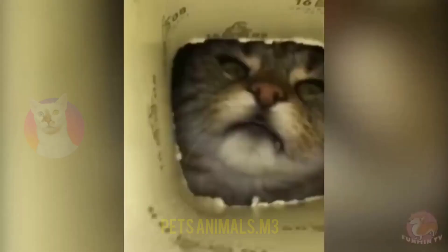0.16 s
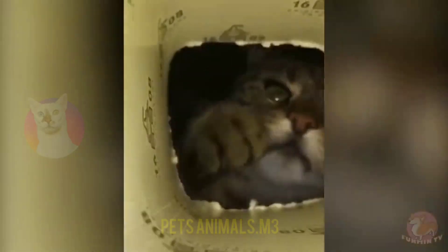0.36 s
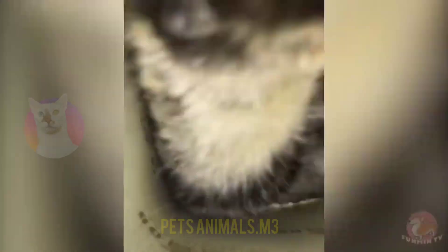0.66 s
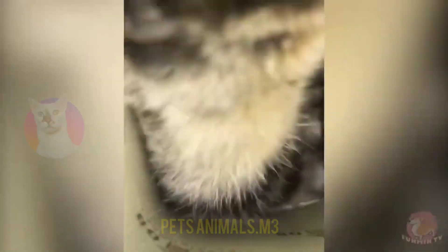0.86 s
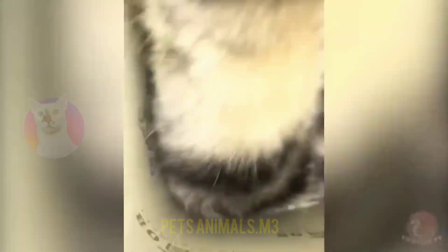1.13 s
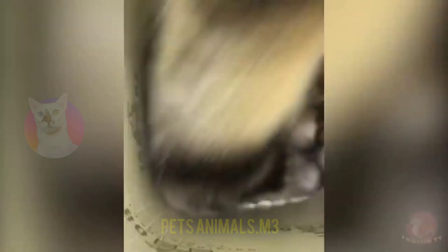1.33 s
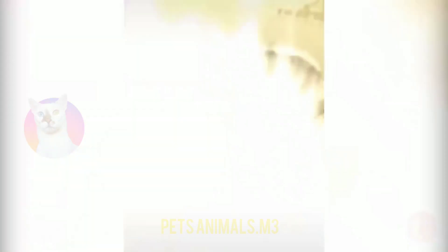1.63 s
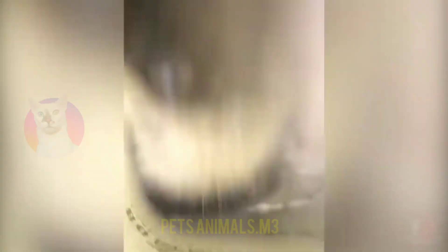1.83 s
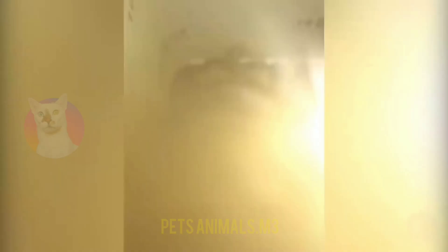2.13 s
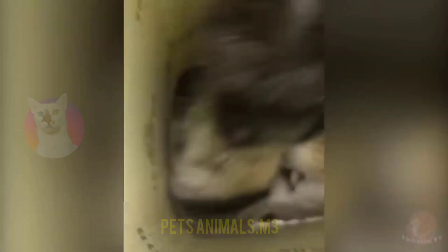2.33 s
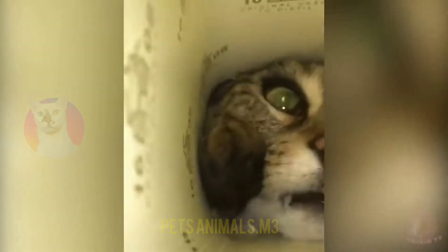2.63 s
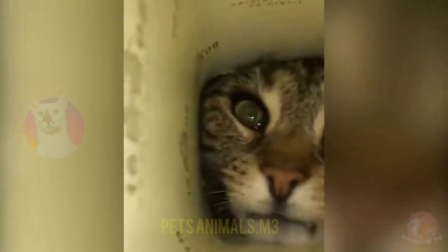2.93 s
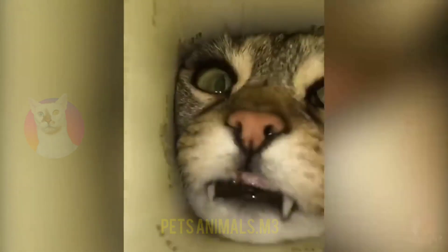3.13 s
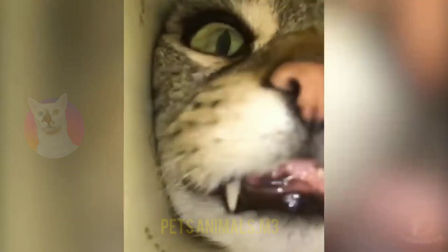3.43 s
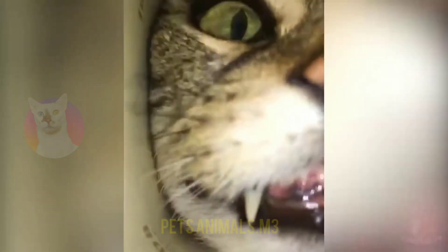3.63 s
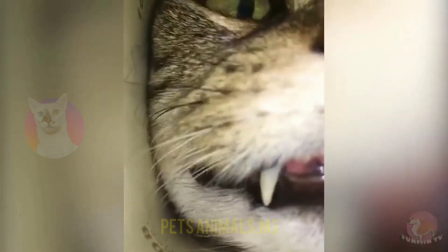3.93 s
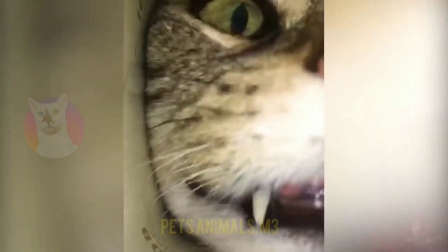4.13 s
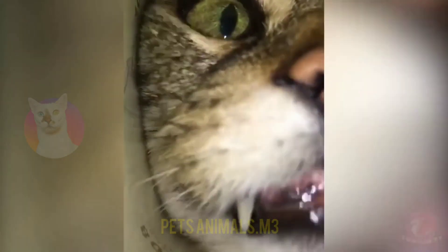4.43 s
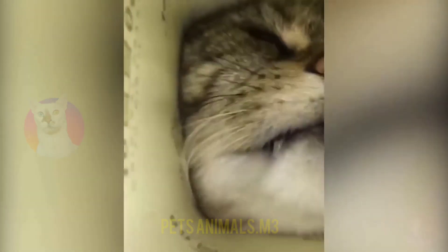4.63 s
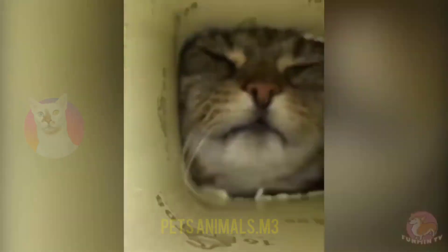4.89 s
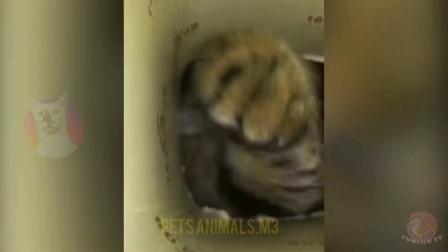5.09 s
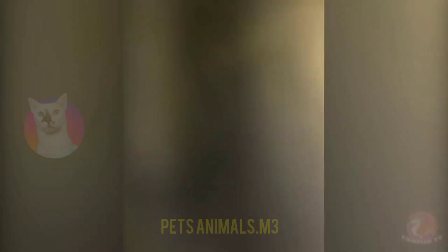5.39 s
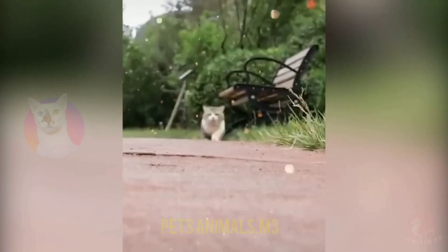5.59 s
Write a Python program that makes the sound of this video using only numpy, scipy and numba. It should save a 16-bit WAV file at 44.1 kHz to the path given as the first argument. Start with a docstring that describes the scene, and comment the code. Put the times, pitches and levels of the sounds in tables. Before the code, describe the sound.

A close, dry, almost mono phone perspective inside a cardboard box as a cat pushes through a torn hole. A faint rubbing grumble opens, with a raspy swipe and low thump near 0.2 s. Hard hollow knocks with claw ticks strike around 0.55, 0.65 and 0.9 s, mixed with brief bright scrapes of fur over the ragged edge. More clusters come at 1.2, 1.45 and 1.6 s; the heaviest, slightly squashed by the microphone, lands about 1.95 s with a deep box thump, and another around 2.2 s. From 2.4 to 3.2 s, soft dull pats patter over airy fur hiss and wall grumble, with a tiny faint squeak at 2.6 s. Then it is sparser: a knock at 3.7 s, near quiet around 4.1, a sharp tight knock cluster at 4.6, gentle rubbing, small ticks around 5.1 to 5.35, and a last dull knock at 5.5 before stopping abruptly.

```python
"""A cat reaches through a hole in a cardboard box towards a phone lying inside.
Rubbed walls grumble from the start: coloured stick-slip clicks. Paw and claws soon knock the walls:
short decaying modes, with low thumps as the box is shoved. Swipes drag fur over the torn edge: hair
hisses, the edge rasps in drifting bands. A faint squeak comes midway; the sound stops short at the end.
The phone rounds off the loudest knocks."""
import sys
import numpy as np
from scipy import signal
from scipy.fft import rfft, irfft
from scipy.io import wavfile
from scipy.ndimage import uniform_filter1d
from numba import njit

SR = 44100
rng = np.random.default_rng(int(sys.argv[2]) if len(sys.argv) > 2 else 0)


def dump(signal):
    """Clip the signal to [-1, 1] and save it as 16-bit WAV at the path in sys.argv[1]."""
    limited = np.clip(np.atleast_2d(signal).T, -1, 1)
    pcm = np.round(limited * 32767).astype(np.int16)
    wavfile.write(sys.argv[1], SR, pcm)


def volts_from_db(level):
    """Convert decibel levels to linear amplitude ratios."""
    exponent = np.asarray(level, float) / 20
    return 10 ** exponent


N = 253575
END_S = 5.538

# face and shoulder leaning on the card: start_s, hiss_db, grumble_db (interpolated)
LEAN_CURVE = [(0.0, -97, -63), (0.3, -89, -59), (0.42, -74, -63.5), (0.46, -91, -64.5), (0.75, -72, -45),
              (1.8, -63.5, -48), (2.09, -94.5, -50.5), (2.36, -65, -50.5), (2.46, -52.5, -33.5),
              (2.822, -45, -38.5), (2.911, -58, -44), (3.11, -46.5, -37), (3.62, -55.5, -38),
              (3.73, -62, -39), (3.91, -80, -47.5), (4.08, -84.5, -54.5), (4.27, -61.5, -42.5),
              (4.39, -64.5, -43.5), (4.448, -73, -49), (4.59, -55.5, -41.5), (4.82, -44.5, -36),
              (4.876, -53.5, -42.5), (4.99, -45, -36), (5.061, -52, -41), (5.14, -69.5, -55.5),
              (5.25, -51.5, -35), (5.32, -59, -49.5), (5.54, -66.5, -33)]
# furry leg over the torn edge: start_s (rise complete), length_s, hiss_db, rasp_over_hiss_db,
# rasp_centre_hz (at full level), grumble_db
SWIPES = [(0.184, 0.097, -43.5, 2.5, 2440, -31.5), (0.506, 0.041, -60.5, 8, 1500, -63.5),
          (0.548, 0.046, -39, 7, 2885, -29), (0.603, 0.1, -50, 10, 1600, -33.5),
          (0.779, 0.062, -51, 5.5, 2000, -61), (0.881, 0.03, -52, 5, 2200, -46.5),
          (0.946, .02, -55.5, 14, 2900, -47), (0.975, 0.09, -39, 8, 4000, -38),
          (1.05, 0.039, -52.5, 7.5, 2860, -39), (1.3, 0.036, -46.5, 10, 4110, -40.5),
          (1.356, 0.0058, -56, 12.5, 1315, -32.5), (1.454, 0.08, -54, 12, 2600, -32.5),
          (1.624, 0.035, -39, 2.5, 1598, -30), (1.698, 0.051, -50.5, 9, 2210, -44.5),
          (1.863, 0.052, -54, 10, 2840, -44), (1.95, 0.0074, -32.5, 3.5, 1300, -27),
          (1.98, 0.052, -51, 11, 2100, -34), (2.144, .035, -63.5, 13, 2500, -43),
          (2.195, 0.028, -46, 9.5, 1800, -26.5), (2.24, 0.053, -53, 13.5, 1750, -29.5),
          (2.594, 0.047, -43.5, 7.5, 2250, -31.5), (3.061, 0.0057, -38, 7, 3220, -29.5),
          (3.772, 0.075, -59, 12.5, 2000, -39), (3.965, 0.044, -66, 11, 900, -51),
          (5.036, 0.0071, -46, 7, 4210, -54), (5.133, 0.0042, -56.5, 6.5, 4000, -49),
          (5.392, 0.064, -51, -6.5, 2300, -69)]
# colours of hair, torn edge, rubbed wall and rocking box: frequency_hz, relative_density_db
HAIR_COLOUR = [(2760, -31.5), (4500, -4.5), (5000, 2.5), (5700, 6), (9280, 6.5), (12600, 4), (13500, -7.5)]
EDGE_COLOUR = [(600, -21), (850, -5.5), (1200, 0), (1700, -2.5), (2250, -2.5), (2600, -6.5), (3100, -8),
               (4750, -10.5), (5200, -19), (6500, -34.5)]
GRUMBLE_COLOUR = [(25, -25.5), (55, -12.5), (130, -6), (244, -4), (355, -2.5), (465, -12.5), (628, -8.5),
                  (786, -20), (900, -24), (1170, -18.5), (1500, -49.5), (1980, -120)]
ROCK_COLOUR = [(25, -20), (55, -5), (100, -8.5), (160, -28)]
# mean pitches of stiff fibres of the tear: pitch_hz
FIBRES_HZ = (2876, 3350., 3910, 4650)
# blows on the card: start_s (before the onset lag), wall_peak_db, wall_tone_hz,
# claw_db (relative to the wall)
KNOCKS = [(0.077, -33, 245, -81), (0.171, -33, 240, -30), (0.229, -14, 276, -35), (0.533, -1.5, 312, -19),
          (0.545, -14, 286, -27.5), (0.651, -3, 387, -8), (0.662, -11.5, 325, -34), (0.857, -26, 248, -19),
          (0.873, -23, 320, -25), (0.908, -9, 340, -11), (0.978, -22.5, 562, -65), (1.2, -15.5, 400, -9.5),
          (1.21, -7, 424, -12), (1.219, -11.5, 332, -27), (1.225, -13.5, 355, -34), (1.289, -27, 290, -8),
          (1.326, -20.5, 412, -13), (1.417, -44, 320, -27), (1.445, -4, 395, -5.5), (1.454, -27, 330, 5),
          (1.612, -11.5, 400, -2), (1.634, -4.5, 263, -5.5), (1.644, -6.5, 233.5, -17),
          (1.897, -26, 588, -1), (1.945, -21, 355, -2.5), (1.96, -0.5, 345, -6), (1.973, -3.5, 280, -16),
          (2.052, -25, 270, -61), (2.143, -17.5, 319, -54), (2.187, -31, 575, 3), (2.202, -9.5, 193, 0.5),
          (2.211, -4.5, 296, -9), (2.264, -14, 312, -56), (2.286, -23, 291, -51), (2.395, -32.5, 277, -27),
          (2.474, -20.5, 187, -45), (2.492, -17, 231, -61), (2.512, -18, 184, -38),
          (2.534, -22.5, 199, -52), (2.553, -23.5, 228, -49), (2.6, -17, 276, -34), (2.618, -19, 266, -26),
          (2.666, -19.5, 264, -65), (2.86, -16, 231, -58), (2.888, -22, 210, -42), (2.941, -21.5, 568, -61),
          (3.072, -17.5, 215, -49), (3.2, -22.5, 279, -14), (3.6832, -9.5, 301, -17.5),
          (3.915, -28, 161, -31), (4.534, -31, 302, -30), (4.579, -5, 338, -12.5), (4.588, -6, 265.4, -17),
          (4.6, -9, 243, -26), (4.797, -27, 253, -27), (4.811, -24.5, 298, -25), (4.843, -27, 280, -30),
          (5.089, -31.5, 352, -25), (5.335, -23.5, 595, 1.5), (5.499, -12, 289, -48)]
# wall modes: multiple_of_wall_tone, relative_db, t60_s
WALL_MODES = [(0.661, 7.5, 0.038), (1.01, 10, 0.068), (1.301, -1.5, 0.022), (1.6, 4, 0.015),
              (2.099, -1.5, 0.027)]
# claw modes of the card skin, means before scatter: pitch_hz, relative_db, t60_s
SKIN_MODES = [(691, 3, 0.0055), (1180, 14, 0.0066), (1500, 14, 0.0052), (2144, -6, 0.02),
              (2830, 6.5, 0.0045), (4000, -17.5, 0.007)]
# pushes that move the whole box: start_s, level_db, pitch_hz
SHOVES = [(0.17, -18, 136), (0.224, -7.5, 53), (1.637, -9, 69.4), (1.963, -1.5, 66.6), (2.207, -7, 72),
          (2.49, -24, 112), (3.073, -22.5, 105), (4.582, -17.5, 112)]
# hair or claw sticking on the card: start_s, length_s, mean_pitch_hz, level_db
SQUEAKS = [(2.605, 0.035, 2230, -35)]

# a swipe comes up fast, tires while it lasts, lifts off, and the fur settles softly
RISE_DB_PER_S, SAG_DB_PER_S, FALL_DB_PER_S = 803.5, 44.5, 600
SETTLE_DB, SETTLE_DB_PER_S = -19.5, 159
# a lighter touch loses hiss faster than rasp: rasp over hiss at HISS_REF_DB, growth per dB less
HISS_REF_DB, RASP_OVER_DB, RASP_PER_DB = -50, 5.5, 0.3149
# faster rubbing is louder and its rasp higher
RASP_HZ, RASP_OCT_PER_DB = 2500, 0.07
RASP_SHARP = 1.5  # centre over width, per band-pass stage
ONSET_LAG_S = 0.001465  # constant delay from table time to knock onset
THUMP_RISE_S, THUMP_T60_S = 0.00032, 0.078


def set_rms(x, db):
    """Scale to an rms level."""
    return x * volts_from_db(db) / np.sqrt(np.mean(x ** 2))


def colour(x, shape):
    """Filter by (Hz, dB) points over log frequency, near silent beyond the ends."""
    hz, db = np.transpose(shape)
    f = np.fft.rfftfreq(N, 1 / SR) + 1
    gain_db = np.interp(np.log(f), np.log(hz), db, -120, -120)
    return irfft(rfft(x) * volts_from_db(gain_db), N)


def walk(rate_hz):
    """Random levels, one per 1 / rate, joined by straight slews; spread near 1."""
    hold = int(SR / rate_hz)
    steps = np.repeat(rng.standard_normal(N // hold + 1), hold)
    return uniform_filter1d(steps, hold)[:N] * np.sqrt(3 / 2)


def slips(rate_hz, spread_db):
    """Stick-slip: dense clicks of uneven size."""
    slipping = rng.random(N) < rate_hz / SR
    return slipping * volts_from_db(spread_db * rng.exponential(1, N)) * rng.standard_normal(N)


@njit
def moving_band(x, hz, sharp):
    """State-variable band-pass whose centre moves every sample; sharp is centre over width."""
    y, band, low, damping = np.empty(len(x)), 0., 0., 1 / sharp
    for i in range(len(x)):
        g = np.tan(np.pi * hz[i] / SR)
        v = (band + g * (x[i] - low)) / (1 + g * (g + damping))
        band, low, y[i] = 2 * v - band, low + 2 * g * v, damping * v
    return y


def decay(t, t60_s):
    """Exponential loss of 60 dB in t60."""
    return np.exp(-np.log(1000) * t / t60_s)


def ring(t, hz, t60_s):
    """A decaying mode."""
    return decay(t, t60_s) * np.sin(2 * np.pi * hz * t)


def add(out, start_s, db, sound):
    """Mix one sound in at its start."""
    i = int(start_s * SR)
    out[i:i + len(sound)] += volts_from_db(db) * sound


def swipe(t, length_s):
    """Level in dB around a swipe's start: rise, sagging hold, lift-off, settling fur."""
    after = np.maximum(t - length_s, 0)
    held_db = RISE_DB_PER_S * np.minimum(t, 0) - SAG_DB_PER_S * np.clip(t, 0, length_s)
    return held_db + np.maximum(-FALL_DB_PER_S * after, SETTLE_DB - SETTLE_DB_PER_S * after)


def contact():
    """Hiss, rasp, grumble, rock dB and rasp Hz: powers of lean and swipes add, rasp power weights Hz."""
    t = np.arange(0, N + 64, 64) / SR
    s, lean_hair_db, lean_wall_db = np.transpose(LEAN_CURVE)
    hair_db = np.interp(t, s, lean_hair_db)
    edge_db = hair_db + RASP_OVER_DB + RASP_PER_DB * (HISS_REF_DB - hair_db)
    wall_db = np.interp(t, s, lean_wall_db)
    power = volts_from_db([hair_db, edge_db, wall_db, wall_db - 5]) ** 2
    weighted_hz = power[1] * RASP_HZ * 2 ** (RASP_OCT_PER_DB * (edge_db - HISS_REF_DB))
    for start_s, length_s, hiss_db, over_db, hz, grumble_db in SWIPES:
        shape_db = swipe(t - start_s, length_s)
        # the box rocks mostly by swipes
        full_db = np.array([[hiss_db], [hiss_db + over_db], [grumble_db], [grumble_db - 0.5]])
        more = volts_from_db(shape_db + full_db) ** 2
        power = power + more
        weighted_hz = weighted_hz + more[1] * hz * 2 ** (RASP_OCT_PER_DB * shape_db)
    curves = (*(10 * np.log10(power)), weighted_hz / power[1])
    return [np.interp(np.arange(N) / SR, t, c) for c in curves]


def wall_grumble(wall_db):
    """Walls grumble in coarser jerks; rubbing keeps two wall tones ringing."""
    jerks = set_rms(colour(slips(2000, 0.54), GRUMBLE_COLOUR), 0)
    wall = jerks.copy()
    for hz, db in ((290., 3), (620., 1)):
        wall += volts_from_db(db) * moving_band(jerks, hz * np.exp(0.12 * walk(8)), 8.)
    return set_rms(wall, 0) * volts_from_db(wall_db + 2.2 * walk(21))


def box_rock(rock_db):
    """The box rocks under the rubbing: wavering low noise."""
    return set_rms(colour(rng.standard_normal(N), ROCK_COLOUR), -7.5) * volts_from_db(rock_db + 1.4 * walk(15))


def hair_hiss(hair_db, catch):
    """Hairs slip in dense small clicks; tufts touch in turn, so bands swell and fade on their own."""
    hiss = set_rms(colour(slips(16000, 0.63), HAIR_COLOUR), 0)
    hiss = hiss * volts_from_db(hair_db + 1.0 * catch + 0.28 * walk(22))
    tufts = np.zeros(N)
    for hz in (5600., 8000., 11500.):
        tufts += moving_band(hiss, np.full(N, hz), 1.98) * volts_from_db(3.7 * walk(14) - 8.5)
    return .5 * hiss + tufts


def side_treble(hair_db):
    """Treble noise of opposite sign left and right: the treble differs slightly between channels."""
    return set_rms(colour(rng.standard_normal(N), HAIR_COLOUR), -11.5) * volts_from_db(hair_db + 3 * walk(30))


def edge_rasp(edge_db, edge_hz, catch):
    """Uneven slips over the torn edge drive its flaps, a moving bright band and stiff fibres."""
    # harder strokes favour the bright band
    pressure_db = 0.23 * (edge_db + 36.0)
    broad = set_rms(colour(slips(5000, 1.5), EDGE_COLOUR), -4.5)
    # flaps catch in turn, each in its own drifting band
    flaps = np.zeros(N)
    for hz in (900., 1377.0, 2250., 3060.0, 3950.0):
        flap = moving_band(broad, hz * np.exp(0.1 * walk(9)), 4.48)
        flaps += flap * volts_from_db(5.1 * walk(21) + 0.33 * pressure_db * np.log2(hz / 1600) - 2.0)
    body = 0.44 * broad + flaps
    # the bright band wobbles as the fur shifts over the tear
    band_hz = edge_hz * np.exp(0.05 * walk(20))
    band = colour(slips(6000, .7), EDGE_COLOUR)
    for _ in range(2):
        band = moving_band(band, band_hz, RASP_SHARP)
    band = set_rms(band, 0)
    # single stiff fibres sing in narrow, wavering lines
    fibres = np.zeros(N)
    for hz in FIBRES_HZ:
        line = moving_band(band / band.std(), hz * np.exp(0.042 * walk(15)), 22.)
        fibres += line * volts_from_db(2.5 + 2.3 * walk(25))
    bright = set_rms(band + fibres, -4.5)
    # the higher the bright band, the more it takes over from the broad rasp
    focus_db = 2.38 * np.log2(edge_hz / RASP_HZ)
    bright = bright * volts_from_db(pressure_db + focus_db + 0.76 * walk(40))
    return (body * volts_from_db(-focus_db) + bright) * volts_from_db(edge_db + 1.36 * catch)


def rubbing():
    """One contact drives grumble, rocking, hiss and rasp; hiss and rasp share its catches."""
    hair_db, edge_db, wall_db, rock_db, edge_hz = contact()
    catch = walk(35)
    mid = wall_grumble(wall_db) + box_rock(rock_db)
    mid = mid + hair_hiss(hair_db, catch) + edge_rasp(edge_db, edge_hz, catch)
    return mid, side_treble(hair_db)


def wall_ring(late, hz, claw_db):
    """Struck card: modes chirp down because bending waves are faster at high pitch; peak 1."""
    # phase advance decays: pitch falls as the ring swells
    sagging_t = late + .003 * (1 - np.exp(-late / .0013))
    # the first swings are large and lose energy fastest
    punch = 1 + 8.7 * np.exp(-late / 0.0065)
    # a padded paw pushes for longer than a claw
    rise = (1 - np.exp(-late / (.0009 * volts_from_db(-.17 * claw_db)))) ** 2
    modes = np.zeros(len(late))
    for multiple, db, t60_s in WALL_MODES:
        modes += volts_from_db(db) * decay(late, t60_s) * np.sin(2 * np.pi * multiple * hz * sagging_t)
    wall = rise * punch * modes
    return wall / np.abs(wall).max()


def claw_tick(late, claw_db, scatter):
    """A claw rings scattered modes of the card skin and cracks fibres in a noise burst."""
    tick = np.zeros(len(late))
    for (hz, db, t60_s), r in zip(SKIN_MODES, scatter):
        tick += volts_from_db(db + 1.5 * r) * ring(late, hz * (1 + .05 * r), t60_s)
    tick *= (1 - np.exp(-late / 0.00083)) ** 2
    hard = volts_from_db(claw_db)
    # cracking grows faster with hardness than the tick
    burst = uniform_filter1d(rng.standard_normal(len(late)), size=3)
    crack = (late > 0) * np.exp(-late / 0.0046) * burst * hard * volts_from_db(-8.5)
    return hard * (tick + crack)


def knocks():
    """Blows sound claw and wall after a short constant lag; shoves thump the whole box."""
    out, t = np.zeros(N + SR), np.arange(SR // 4) / SR
    late = np.maximum(t - ONSET_LAG_S, 0)
    scatters = rng.standard_normal((len(KNOCKS), len(SKIN_MODES)))
    for (start_s, db, hz, claw_db), scatter in zip(KNOCKS, scatters):
        add(out, start_s, db, wall_ring(late, hz, claw_db) + claw_tick(late, claw_db, scatter))
    for start_s, db, hz in SHOVES:
        add(out, start_s, db, (1 - np.exp(-t / THUMP_RISE_S)) * ring(t, hz, THUMP_T60_S))
    return out[:N]


def squeaks():
    """Sticking hair or claw: short tones of unsteady pitch that swell and die."""
    out = np.zeros(N)
    for start_s, length_s, hz, db in SQUEAKS:
        n = int(length_s * SR)
        wobble = 1 + .3 * uniform_filter1d(rng.standard_normal(SR // 10), size=64)[:n]
        add(out, start_s, db, np.hanning(n) * np.sin(2 * np.pi * np.cumsum(hz * wobble) / SR))
    return out


def scene():
    """Rubbing, knocks and squeaks in the middle, a little side treble; a quick fade ends all."""
    mid, side = rubbing()
    mid = mid + knocks() + squeaks()
    fade = np.clip((END_S - np.arange(N) / SR) / 0.00086, 0, 1)
    return fade * (mid + side * np.array([[1], [-1]]))


def low_pass(x):
    """Removes everything above the highest recorded frequency."""
    return signal.sosfilt(signal.butter(12, 14210, fs=SR, output="sos"), x)


def record(dry):
    """The phone loses the deepest bass, rounds off peaks near its ceiling and cuts the top."""
    ceiling = .64
    x = signal.sosfilt(signal.butter(2, 38, "high", fs=SR, output="sos"), dry)
    x = x / (1 + np.abs(x / ceiling) ** 4) ** (1 / 4)
    x = signal.sosfilt(signal.ellip(8, .2, 60, 13400, fs=SR, output="sos"), x)
    return low_pass(x)


dry = scene()
out = record(dry)
dump(out)
```